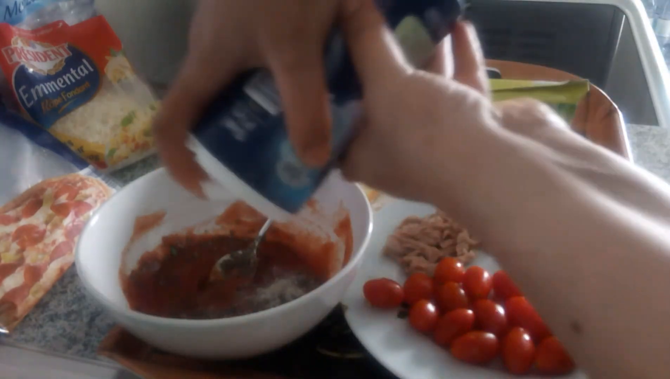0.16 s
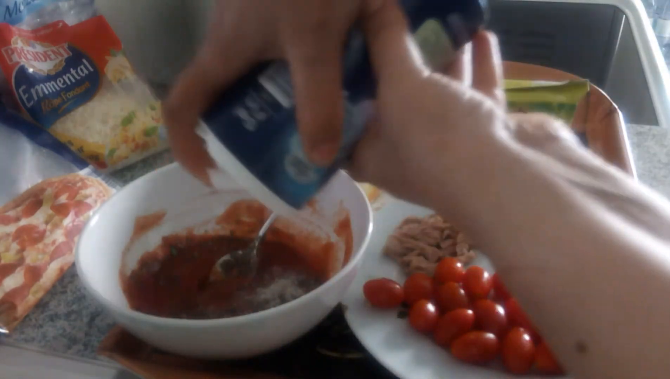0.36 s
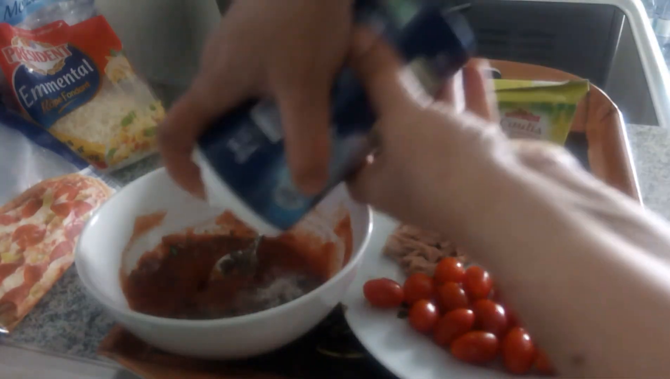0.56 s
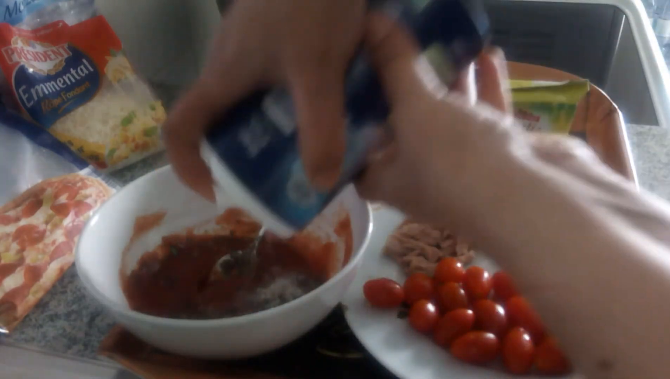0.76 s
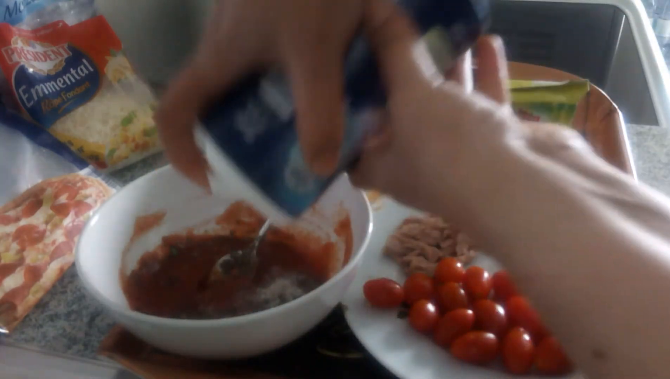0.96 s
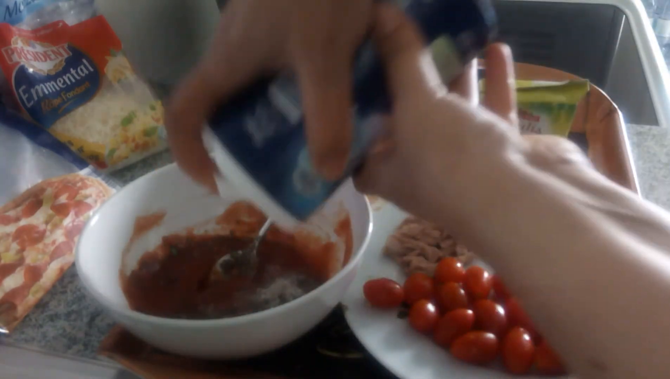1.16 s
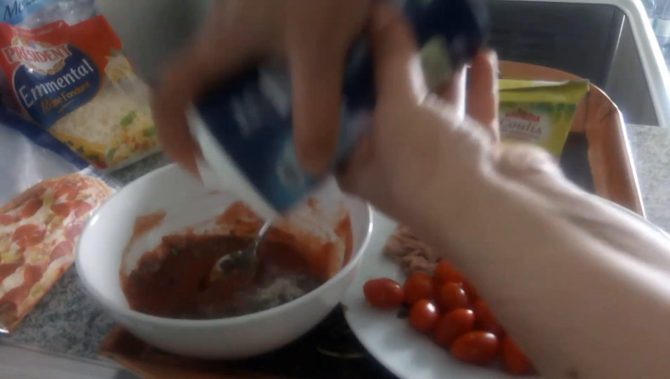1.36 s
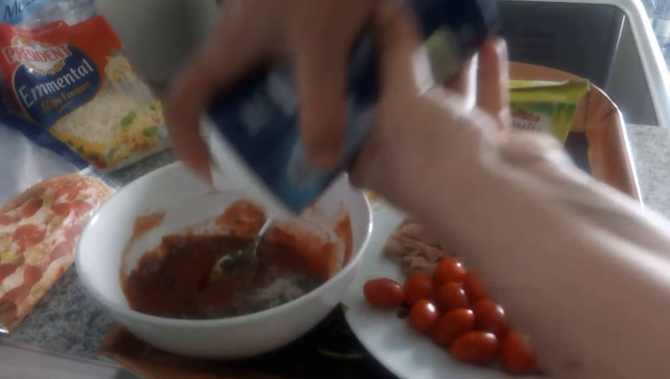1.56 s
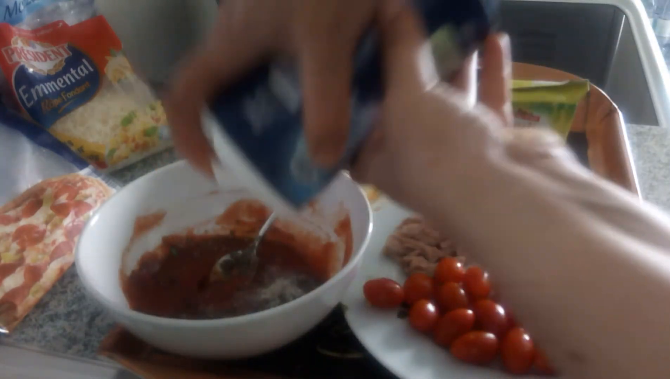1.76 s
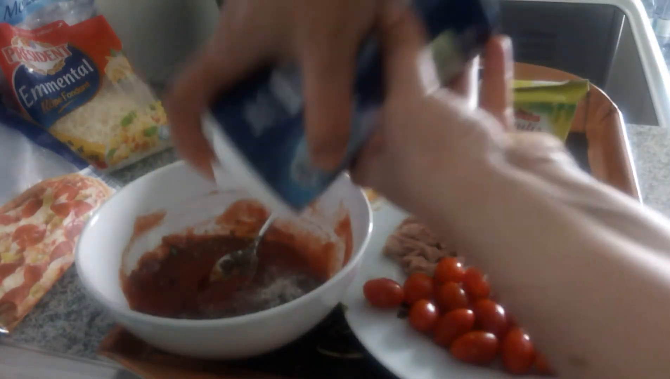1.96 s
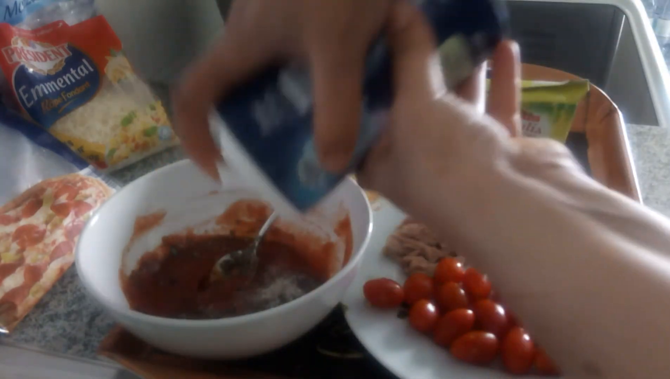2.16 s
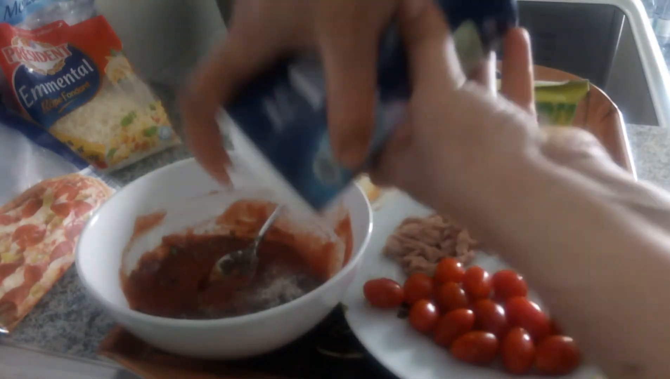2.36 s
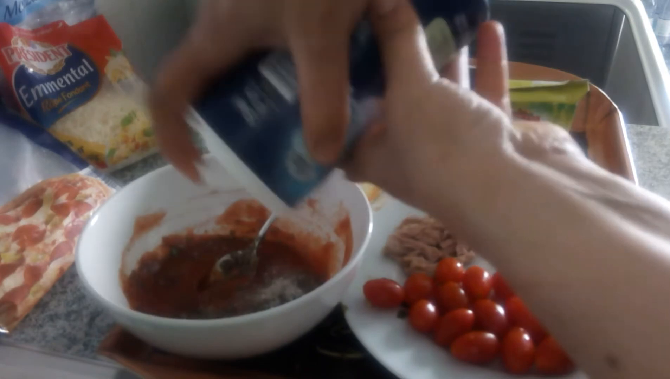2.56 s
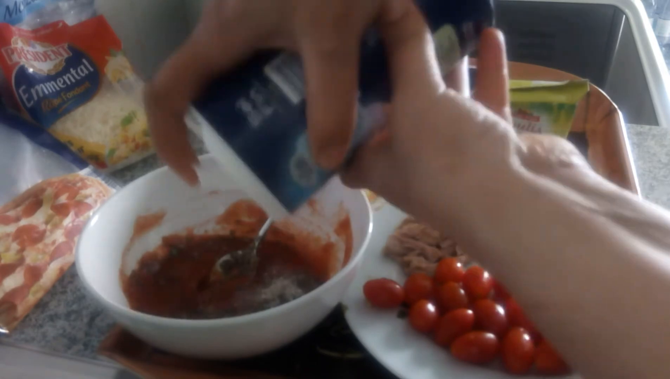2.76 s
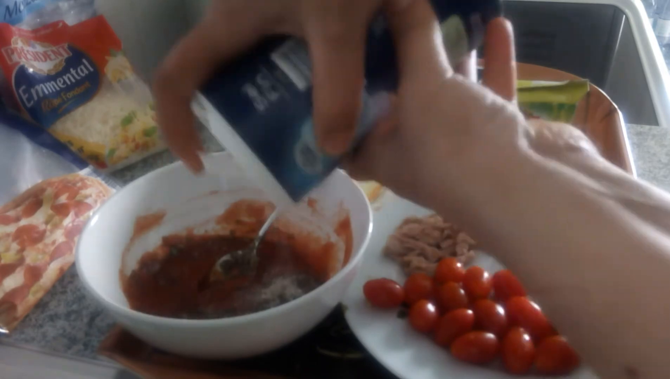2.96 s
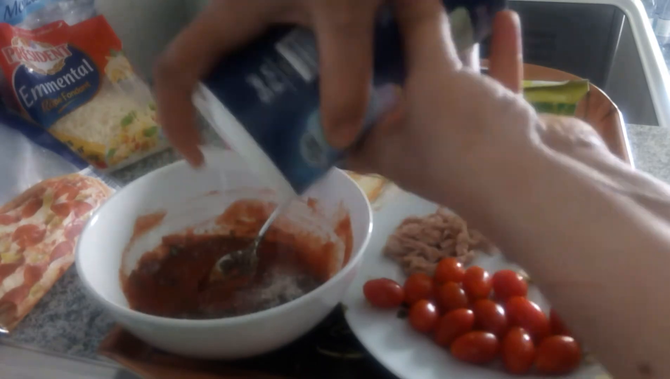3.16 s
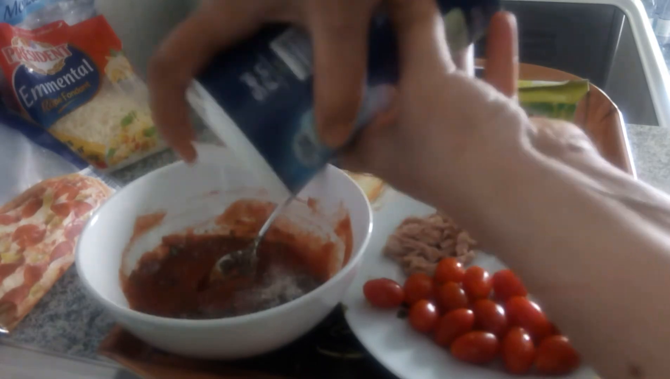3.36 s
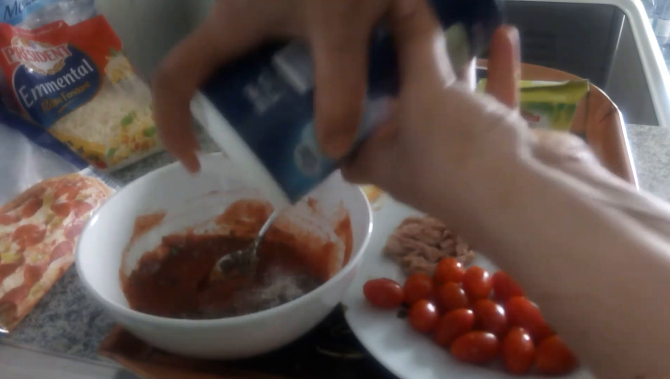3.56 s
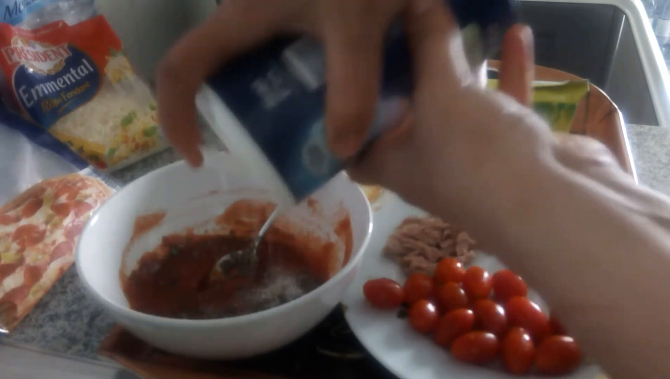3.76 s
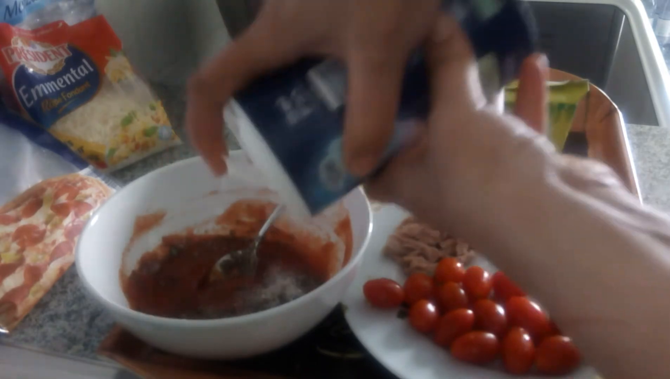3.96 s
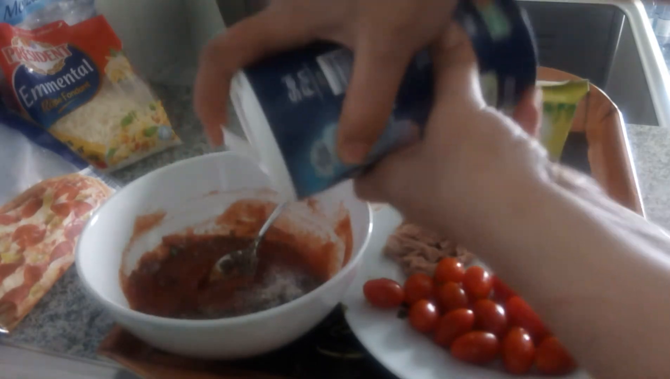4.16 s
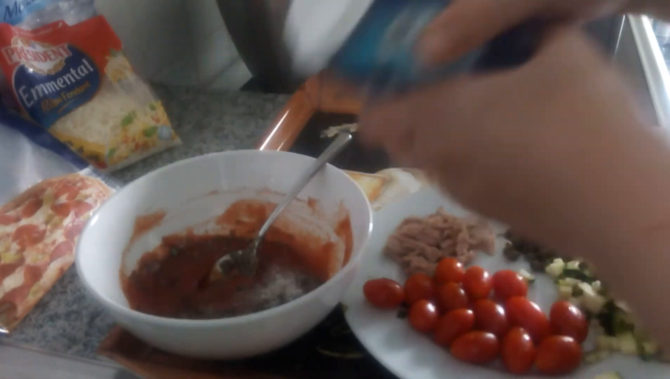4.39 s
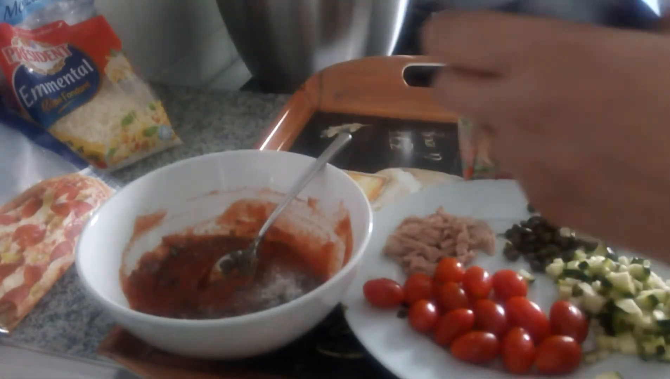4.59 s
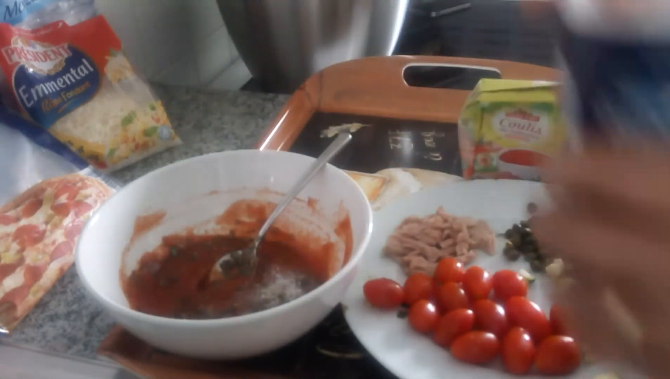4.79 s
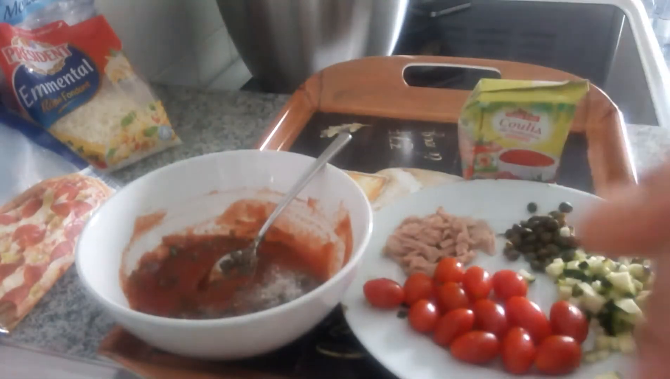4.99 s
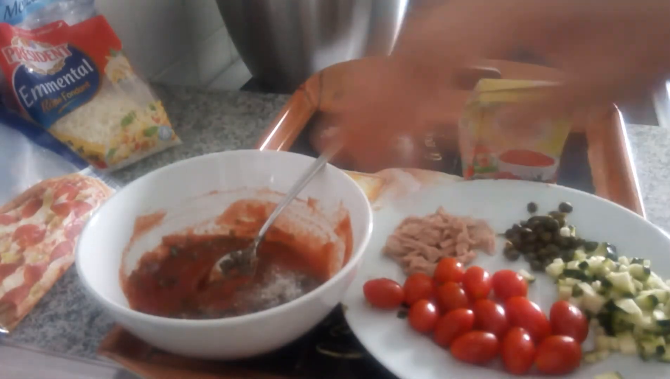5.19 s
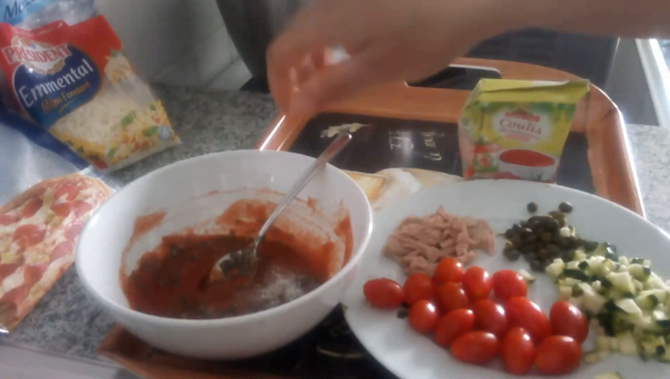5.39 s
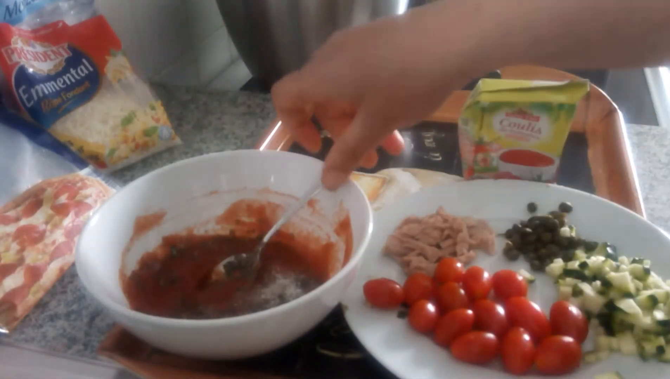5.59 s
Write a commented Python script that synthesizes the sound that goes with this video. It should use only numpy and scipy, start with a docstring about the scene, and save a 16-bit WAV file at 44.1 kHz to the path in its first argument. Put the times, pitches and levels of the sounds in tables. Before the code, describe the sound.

In a home kitchen, a nearby stereo camera hears fine salt thrown inside a cardboard canister. After one double swish at the start and a softer slide near 0.2 s, steady shaking runs from about 0.55 to 4.1 s, roughly five strokes a second, each a weaker back swish followed by a brighter, crisp forward hiss with papery rustle. Strokes vary slightly, strongest near 2 s. From 4.4 to 4.75 s the salt pours to the bottom in one longer rush, with fingers rubbing the cardboard. At 4.79 s the plastic spout snaps shut, sharp and loud, with a short tubular ring. After a near-quiet gap, rapid hard knocks at 5.4 s and a duller, heavier thump at 5.51 s hit the counter, rattling nearby things. A spoon scrapes the ceramic bowl briefly at 5.55-5.64 s. Low appliance drone, a thin motor whine and barely audible distant whistles lie behind, with slight short reverberation.

```python
"""Salt hisses back and forth in a cardboard canister, shaken about five times a second over a bowl in a kitchen.
It pours to the bottom, the spout snaps shut, the canister thumps on the counter and a spoon scrapes the bowl.
Salt, fingers and spoon are uneven random clicks through resonances; snaps and thumps are decaying crackle and
ringing modes. Faint far whistles are wavering sines, and appliances drone behind as coloured noise and a whine.
"""
import sys
import numpy as np
from scipy import signal
from scipy.fft import rfft, irfft, next_fast_len
from scipy.io import wavfile

SR = 44100
rng = np.random.default_rng(int(sys.argv[2]) if len(sys.argv) > 2 else 0)


def nominal_scale(level):
    """Amplitude ratio for a level in decibels (scalar or array-like)."""
    x = np.asarray(level, float) / 20
    return 10 ** x


def wav_out(sig):
    """Save sig, one row per channel (or a flat mono array), as 16-bit PCM at SR to the path in sys.argv[1]."""
    wavfile.write(sys.argv[1], SR, np.round(np.clip(np.atleast_2d(sig).T, -1, 1) * 32767).astype(np.int16))


N = 248613
T = np.arange(N) / SR
M = next_fast_len(N + 4096) // 2 * 2  # even FFT length, with room for filter tails
HZ = np.maximum(np.fft.rfftfreq(M, 1 / SR), 1)


def unit(x):
    """Scale to rms 1."""
    return x / np.sqrt(np.mean(x ** 2))


def along(table):
    """Read a (f/Hz, value) table at every frequency bin, on a log frequency axis."""
    hz, value = np.transpose(table)
    return np.interp(np.log(HZ), np.log(np.maximum(hz, 1)), value)


def colour(x, gain):
    """Filter by a gain per frequency bin."""
    return irfft(rfft(x, M) * gain, M)[..., :N]


def lowpass_gain(corner_hz):
    """Gentle low-pass that turns white noise into slow wandering."""
    return 1 / (1 + (HZ / corner_hz) ** 2)


def resonances(table):
    """Summed response of (f/Hz, width/Hz, level/dB) resonators."""
    return sum(nominal_scale(db) / (1 + 1j * (HZ ** 2 - hz ** 2) / (HZ * width)) for hz, width, db in table)


def causal(table):
    """Minimum-phase response of a (f/Hz, level/dB) table, energy 1: nothing sounds before the hit."""
    cepstrum = irfft(np.log(nominal_scale(along(table))), M)
    cepstrum[1:M // 2] *= 2
    cepstrum[M // 2 + 1:] = 0
    response = irfft(np.exp(rfft(cepstrum)), M)[:2048]
    return response / np.sqrt(np.sum(response ** 2))


def curve(table):
    """Gain from a (t/s, level/dB) curve, silent outside the table."""
    s, db = np.transpose(table)
    return nominal_scale(np.interp(T, s, db, left=-120, right=-120))


def strokes(table, fade):
    """Gain of (start t/s, length t/s, level/dB) strokes that hold, with edges of time constant fade."""
    out = np.zeros(N)
    for s, length, db in table:
        outside = np.clip(np.maximum(s - T, T - s - length), 0, None)
        out += nominal_scale(db) * np.exp(-outside / fade)
    return out


def grains(rate, spread_db, size=N):
    """Sparse clicks of very uneven size, rate per second."""
    strength = nominal_scale(spread_db * rng.exponential(size=size)) * rng.standard_normal(size)
    return strength * (rng.random(size) < rate / SR)


def burst(response, t60, rate, size):
    """Crackle that dies away, the treble in half the time, through a body's colour."""
    crackle = unit(grains(rate, 0.45, size=size))
    crackle[0] = 0.85  # the first contact has a set strength
    t = T[:size]
    bass = signal.lfilter([.25], [1, -.75], crackle * 1000. ** (-t / t60))
    quick = crackle * 1000. ** (-t / (.5 * t60))
    treble = quick - signal.lfilter([.25], [1, -.75], quick)
    return np.convolve(bass + treble, response)[:size]


def ring(modes, phases, size):
    """Decaying sines, each with its own starting phase."""
    t = T[:size]
    out = np.zeros(size)
    for (hz, db, t60), phase in zip(modes, phases):
        out += nominal_scale(db) * np.sin(2 * np.pi * hz * t + phase) * 1000. ** (-t / t60)
    return out


def add(out, s, x):
    """Mix x in at time s."""
    i = int(s * SR)
    out[i:i + len(x)] += x[:N - i]


# each shake throws the salt back, then hard forward against the spout end:
# forward landing t/s, forward level/dB, back landing earlier by t/s, back level/dB
SHAKES = [(0.056, -45, 0.043, -47), (0.613, -44.5, 0.053, -47.5), (0.81, -47, .063, -54),
          (0.994, -47, 0.066, -51.5), (1.181, -45, 0.059, -49), (1.365, -48, 0.064, -53.5),
          (1.596, -45, 0.07, -52.5), (1.789, -43.5, 0.066, -49), (1.994, -42.5, 0.071, -49),
          (2.185, -43, 0.068, -49), (2.37, -46, 0.07, -52), (2.56, -44.5, 0.069, -52.5),
          (2.741, -48.5, 0.061, -53), (2.935, -46.5, 0.057, -53.5), (3.136, -45.5, 0.063, -51.5),
          (3.34, -45, 0.065, -48.5), (3.528, -44, 0.063, -49.5), (3.71, -45.5, .062, -52.5),
          (3.918, -45, 0.07, -51.5), (4.108, -45, 0.068, -55)]
FORWARD_RISE_S, FORWARD_FALL_S, FORWARD_WALL_DB = .015, .024, -13.5  # wall rustle relative to the hiss
BACK_RISE_S, BACK_FALL_S, BACK_WALL_DB = 0.023, 0.02, -14
# slow tilts, the salt slides over instead of landing: start t/s, length t/s, level/dB
TILTS = [(0.16, .1, -51.5), (0.422, 0.029, -59), (4.26, 0.048, -60), (5.03, 0.038, -60)]
TILT_FADE_S, TILT_WALL_DB = .018, -11
# salt pouring to the bottom as the canister turns upright, then settling: t/s, level/dB
POUR = [(4.33, -66), (4.39, -58.5), (4.43, -45), (4.52, -46), (4.62, -42), (4.71, -47.5), (4.73, -49),
        (4.78, -56), (4.82, -50.5), (4.95, -62), (5.1, -69.5), (5.25, -85)]
POUR_WALL_DB = -7.5
# colour of grain ticking on grain: f/Hz, relative level/dB
GRAIN_HISS = [(1180, -15.5), (2000, -14.5), (2760, -12.5), (3010, -13), (3280, -11), (3430, -8.5),
              (3770, -10), (4730, -7.5), (6420, -3), (7770, -7), (8400, -10), (10700, -12), (13300, -22),
              (14900, -13.5), (16000, -23.5)]
# resonances of the cardboard: f/Hz, width/Hz, relative level/dB
CARDBOARD_WALL = [(1134, 67, -10), (1250, 130, -5.5), (1506, 69, 1), (1760, 180, -17), (2116, 37, 1),
                  (2930, 1330, -2)]
# the open spout rings while it points down: f/Hz, width/Hz (of one of two passes), level/dB
SPOUT_HOLE = [(6480, 810, 0)]
# the front of each forward throw slaps the spout: lead before the landing, level against the throw
SLAP_LEAD_S, SLAP_DB, SLAP_RISE_S, SLAP_FALL_S = 0.0064, -3, .002, 0.011
CLUMP_HZ, CLUMP_DB = 35, 2  # salt moves in clumps: rate and rms depth of the wall rustle's flicker


def salt():
    """Grains tick on each other and on the cardboard, which rustles lower down; two unrelated swarms."""
    hiss, rustle = np.zeros(N), np.zeros(N)  # powers
    surges = [(s, db, FORWARD_WALL_DB, FORWARD_RISE_S, FORWARD_FALL_S) for s, db, _, _ in SHAKES]
    surges += [(s - lead, db, BACK_WALL_DB, BACK_RISE_S, BACK_FALL_S) for s, _, lead, db in SHAKES]
    for s, db, wall_db, rise, fall in surges:
        near = slice(max(int((s - .3) * SR), 0), int((s + .3) * SR))
        d = T[near] - s
        # the mass arrives and trickles away; the peak is rounded
        shape = 2 / (np.exp(-d / rise) + np.exp(d / fall))
        hiss[near] += (nominal_scale(db) * shape) ** 2
        rustle[near] += (nominal_scale(db + wall_db) * shape) ** 2

    slide = strokes(TILTS, TILT_FADE_S)
    hiss += slide ** 2
    rustle += (nominal_scale(TILT_WALL_DB) * slide) ** 2

    # the spout hole follows throws and tilts, not the pour
    hole = nominal_scale(-13) * np.sqrt(hiss)
    for s, db, _, _ in SHAKES:
        d = T - s + SLAP_LEAD_S
        hole += nominal_scale(db + SLAP_DB) * np.exp(-np.abs(d) / np.where(d < 0, SLAP_RISE_S, SLAP_FALL_S))

    pour = curve(POUR)
    hiss += pour ** 2
    rustle += (nominal_scale(POUR_WALL_DB) * pour) ** 2
    clumps = unit(colour(rng.standard_normal(N), lowpass_gain(CLUMP_HZ)))
    rustle *= nominal_scale(2 * CLUMP_DB * clumps)  # doubled because rustle is a power

    swarms = []
    for _ in range(2):
        ticks = unit(colour(grains(9000, 0.68), nominal_scale(along(GRAIN_HISS))))
        hole_ring = unit(colour(grains(5000, 1.5), resonances(SPOUT_HOLE) ** 2))
        wall = unit(colour(grains(5000, 0.87), resonances(CARDBOARD_WALL)))
        swarms.append(np.sqrt(hiss) * ticks + hole * hole_ring + np.sqrt(rustle) * wall)
    return swarms


# the spout closing: t/s, level/dB, crackle t60 t/s, ring level against the crackle/dB
SNAPS = [(4.7855, -23, 0.011, -14), (4.7905, -16.5, 0.039, -14.5), (4.7926, -23, 0.072, -41)]
# colour of the plastic crack: f/Hz, relative level/dB
SNAP_COLOUR = [(500, -24), (1000, -13), (1500, -1.5), (2200, 0), (3000, 1), (4500, -1.5), (6200, -3),
               (8000, -5), (10000, -13), (13500, -25), (16000, -24)]
# short rings of the tube: f/Hz, relative level/dB, t60 t/s
TUBE_MODES = [(190, -9, .12), (1440, -4, .15), (1520, 1, .15), (1640, -5, .1), (2010, -4, .13),
              (2170, 1, .12), (2320, -3, .14), (2540, -7, .1)]


def spout():
    """A crack of plastic with short rings of the tube."""
    out = np.zeros(N)
    plastic = causal(SNAP_COLOUR)
    for s, db, t60, ring_db in SNAPS:
        tube = ring(TUBE_MODES, rng.normal(0, 0.95, len(TUBE_MODES)), size=8000)
        add(out, s, nominal_scale(db) * (burst(plastic, t60, 25000, size=8000) + nominal_scale(ring_db) * tube))
    return out


# set down on the counter: t/s, push level/dB, contact t/s, rattle level/dB, rattle t60 t/s
THUMPS = [(5.3953, -22.5, 0.00049, -19, 0.045), (5.4006, -25, 0.0011, -35, 0.11),
          (5.4191, -22.5, 0.00084, -21.5, 0.12), (5.5110, -15, 0.00292, -38, 0.22)]
# modes of the counter: f/Hz, relative level/dB, t60 t/s
COUNTER_MODES = [(122.5, 2, 0.072), (176, -15, 0.083), (203, 0.5, 0.054), (316, -5.5, 0.15),
                 (412, -12, 0.14), (507, -16, 0.18), (547, -11, 0.18), (618.2, -2, 0.52), (779, -2.5, 0.11),
                 (960, -31, 0.077), (1085, 1.5, 0.063)]
# things on the counter shaken by a blow: f/Hz, relative level/dB
RATTLE = [(100, -51), (250, -11.5), (450, 0.5), (800, -6.5), (1100, -8.5), (1500, -15.5), (2200, -19.5),
          (3300, -31), (4200, -31), (6500, -32), (9000, -41.5), (16000, -59)]


def counter():
    """Each blow is a half-sine push into the counter's modes; a long contact keeps only the bass."""
    out, loose = np.zeros(N), np.zeros(N)
    clutter = causal(RATTLE)
    modes = ring(COUNTER_MODES, np.zeros(len(COUNTER_MODES)), size=12000)
    for s, db, contact, rattle_db, t60 in THUMPS:
        push = np.sin(np.pi * np.clip(T[:400] / contact, 0, 1))
        body = np.convolve(modes, push / push.sum())[:12000]
        add(out, s, -nominal_scale(db) * body)
        add(loose, s, nominal_scale(rattle_db) * burst(clutter, t60, 6000, size=12000))
    # the slab is too small to radiate below its first mode
    slab = signal.sosfilt(signal.butter(2, 85, "high", fs=SR, output="sos"), out)
    return slab, loose


# spoon strokes on the bowl: start t/s, length t/s, level/dB
SCRAPE = [(5.545, 0.0053, -48.5), (5.56, 0.03, -44), (5.611, 0.012, -47.5), (5.63, .006, -50)]
SCRAPE_FADE_S = 0.0039
# resonances of the bowl: f/Hz, width/Hz (of one of two passes), relative level/dB
BOWL = [(1100, 70, -6), (1910, 100, -12), (3200, 120, -8), (4520, 200, -18), (4740, 170, -13),
        (6070, 140, -18), (6380, 180, -13), (6560, 140, -7), (7890, 140, -28), (8500, 130, -30),
        (9350, 120, -39), (10700, 170, -34)]


def spoon():
    """Dense stick-slip clicks ring the ceramic bowl over a dull grind."""
    # each resonance acts twice: dark valleys between the peaks
    bowl = sum(nominal_scale(db) * resonances([(hz, width, 0)]) ** 2 for hz, width, db in BOWL)
    grind = nominal_scale(-20) * resonances([(1440, 300, 0)]) ** 2
    pressure = strokes(SCRAPE, SCRAPE_FADE_S)
    slips = grains(4300, 2.16)
    return colour(pressure * slips, bowl + grind) / np.std(colour(slips, bowl + grind))


# fingers shifting on the cardboard: start t/s, length t/s, level/dB
RUB = [(4.445, 0.053, -50.5), (4.59, 0.018, -51), (4.668, 0.043, -42.5), (4.738, .015, -47.5)]
RUB_FADE_S = 0.0083
# resonances of the rubbed label: f/Hz, width/Hz, relative level/dB
RUB_COLOUR = [(209, 22, 10.5), (750, 1000, -1.5), (1090, 240, -22), (1270, 130, -1), (1660, 270, -2),
              (2330, 460, -11)]


def fingers():
    """Skin drags on the paper label: uneven clicks through its resonances."""
    return strokes(RUB, RUB_FADE_S) * unit(colour(grains(1800, 1.6), resonances(RUB_COLOUR)))


# faint far whistles: start t/s, end t/s, centre f/Hz, mean level/dB
WHISTLES = [(0.677, 1.093, 919, -70.5), (0.978, 1.253, 1416, -73), (3.007, 3.253, 2360, -68),
            (3.5, 3.7, 2098, -69.5), (5.072, 5.122, 3200, -62), (5.2, 5.447, 2100, -68.5)]


def whistles():
    """Soft tones wavering in pitch and level, with short fades."""
    out = np.zeros(N)
    for start, end, hz, db in WHISTLES:
        swell = np.clip(np.minimum(T - start, end - T) / .03, 0, 1)
        wobble = unit(colour(rng.standard_normal(N), lowpass_gain(12)))
        level = nominal_scale(db + 2.5 * np.roll(wobble, N // 2))  # rolled so that level and pitch waver apart
        phase = 2 * np.pi * np.cumsum(hz * (1 + .012 * wobble)) / SR
        out += level * swell * np.sin(phase)
    return out


WHINE_HZ, WHINE_DB, WHINE_DRIFT_HZ = 636.5, -62.5, 2.025  # rms level and rms drift
WHINE_LEAD = 1.42  # lead of the left port in radians


def whine():
    """A motor tone whose pitch drifts slowly."""
    drift = unit(colour(rng.standard_normal(N), lowpass_gain(2.28)))
    phase = 2 * np.pi * np.cumsum(WHINE_HZ + WHINE_DRIFT_HZ * drift) / SR
    return nominal_scale(WHINE_DB) * np.sqrt(2) * np.sin(phase + np.array([[WHINE_LEAD], [0]]))


# colour of the room noise: f/Hz, relative level/dB
KITCHEN = [(25, -19), (74, -1), (108, 13.5), (137, -1.5), (223, -5.5), (427, -1.5), (624, -4.5),
           (1070, -14), (2200, -17.5), (4000, -20.5), (6560, -23), (8000, -33.5), (13500, -37),
           (15000, -26)]
KITCHEN_DB = -56  # before the two parts add, which lifts room noise and drones by 3 dB
# appliance drones: f/Hz, width/Hz (before squaring), level/dB (before the two parts add)
DRONE = [(45.6, 19, -57), (101.5, 15.5, -55), (134, 24, -64), (191, 44, -61.5), (357.2, 48, -66.5)]
# left-right correlation of the room: f/Hz, correlation (0-1)
LIKENESS = [(60, 0.84), (130, 0.96), (290, 0.46), (640, 0.34), (1400, 0.), (15000, 0.1)]


def kitchen():
    """Room noise with narrow drones; most alike in both ears in the bass."""
    like = along(LIKENESS)
    room = nominal_scale(along(KITCHEN))
    parts = []
    for weight in (np.sqrt(1 + like), np.sqrt(1 - like)):
        gain = nominal_scale(KITCHEN_DB) * room / np.sqrt(np.mean(room ** 2))
        for hz, width, db in DRONE:
            line = np.abs(resonances([(hz, width, 0)])) ** 2
            gain = np.hypot(gain, nominal_scale(db) * line / np.sqrt(np.mean(line ** 2)))
        parts.append(colour(rng.standard_normal(N), gain * weight))
    common, opposite = parts
    return np.array([common + opposite, common - opposite])


# left minus right at full shade, split between the ports: f/Hz, level/dB
LEFT_SHADE = [(200, 14), (380, -7.5), (700, 2.5), (1300, -7), (2400, -13.5), (4400, -11.5), (8000, -7.5),
              (15000, -15.5)]
# share of grains heard alike by both ports: f/Hz, share (0-1)
SALT_LIKENESS = [(1000, 0.2), (4000, 0.06), (8000, 0.02), (15000, 0.06)]


def heard(x, lag_s, room_db, t60, shade=1., other=None):
    """Direct sound reaches the left port later and shaded; tiles and counter send each port its own echoes."""
    tilt = nominal_scale(shade * along(LEFT_SHADE) / 2)
    left = colour(x, tilt * np.exp(-2j * np.pi * HZ * lag_s))
    if other is not None:
        like = along(SALT_LIKENESS)
        left = colour(left, np.sqrt(like)) + colour(other, tilt * np.sqrt(1 - like))
    direct = np.array([left, colour(x, 1 / tilt)])

    t = T[:20000]
    tail = rng.standard_normal((2, 20000))
    dull = signal.lfilter([.4], [1, -.6], tail)
    # the treble is absorbed twice as fast
    tail = dull * 1000. ** (-t / t60) + (tail - dull) * 1000. ** (-2 * t / t60)
    tail *= np.clip(t / 0.00053, 0, 1)
    tail[0] += signal.lfilter([.04], [1, -.96], tail[1] - tail[0])  # long waves are the same at both ports
    tail /= np.sqrt(np.sum(tail[1] ** 2))
    wet = signal.fftconvolve(x[None], tail, axes=1)[:, :N]
    echoes = np.array([colour(wet[0], tilt), colour(wet[1], 1 / tilt)])
    return direct + nominal_scale(room_db) * echoes


def scene():
    """Place every source before the two ports and add the kitchen behind."""
    swarm, other = salt()
    mix = heard(swarm, 0.00014, -7.5, 0.23, shade=0.62, other=other)
    mix += heard(spout(), 0.00018, -10.5, 0.53, shade=.55)
    mix += heard(fingers(), 0.00022, -10, 0.16, shade=0.53)
    slab, loose = counter()
    mix += heard(slab, 0.00011, -7.5, 0.32, shade=0.13)
    mix += heard(loose, 0.00031, -3.0, 0.33, shade=0.57)
    mix += heard(spoon(), .0001, -0.5, 0.088, shade=0.76)
    mix += heard(whistles(), .00003, -7, 0.28, shade=0.61)
    return mix + kitchen() + whine()


def top_cut(x):
    """Nothing passes above the cut-off."""
    return signal.sosfilt(signal.butter(12, 16530, fs=SR, output="sos"), x)


def record(dry):
    """The camera thins the deep bass and cuts the top."""
    thin = signal.sosfilt(signal.butter(2, 70, "high", fs=SR, output="sos"), dry)
    top = signal.sosfilt(signal.ellip(8, .2, 60, 15700, fs=SR, output="sos"), thin)
    return top_cut(top)


dry = scene()
out = record(dry)
wav_out(out)
```